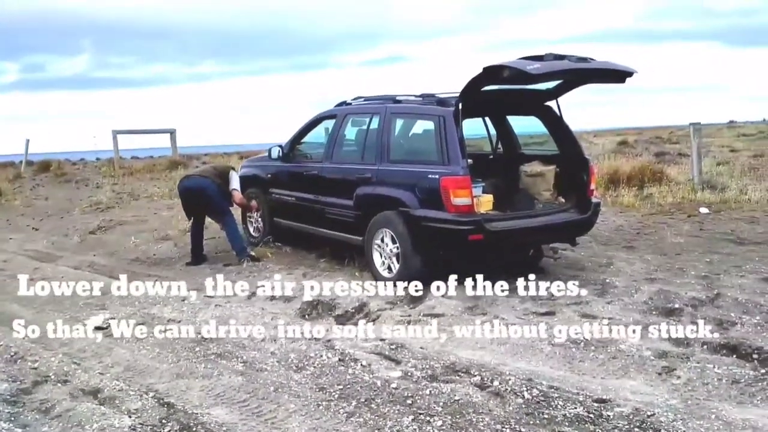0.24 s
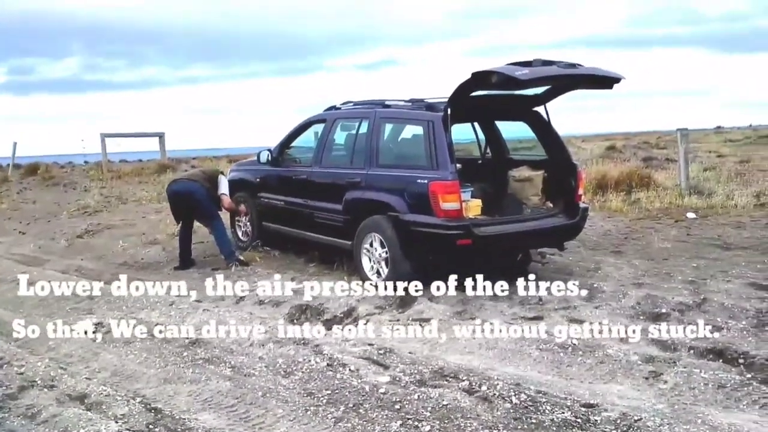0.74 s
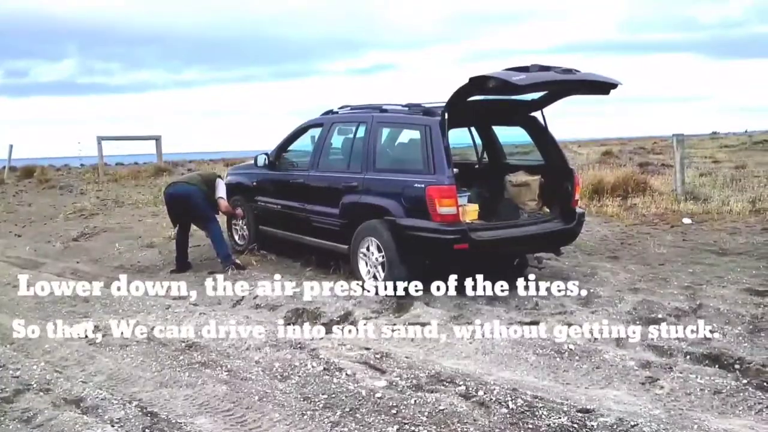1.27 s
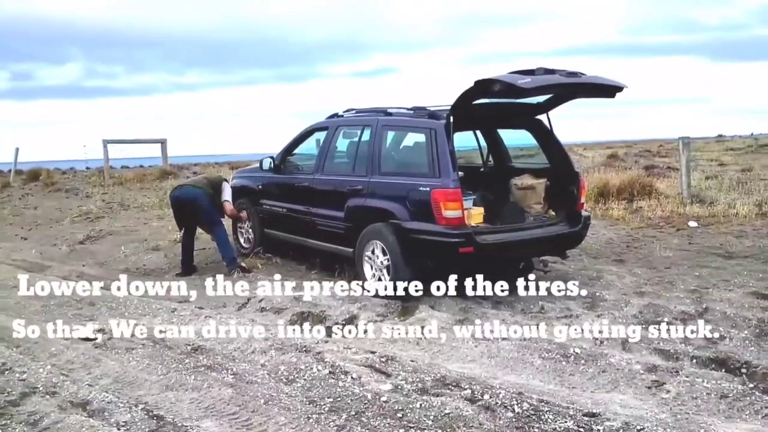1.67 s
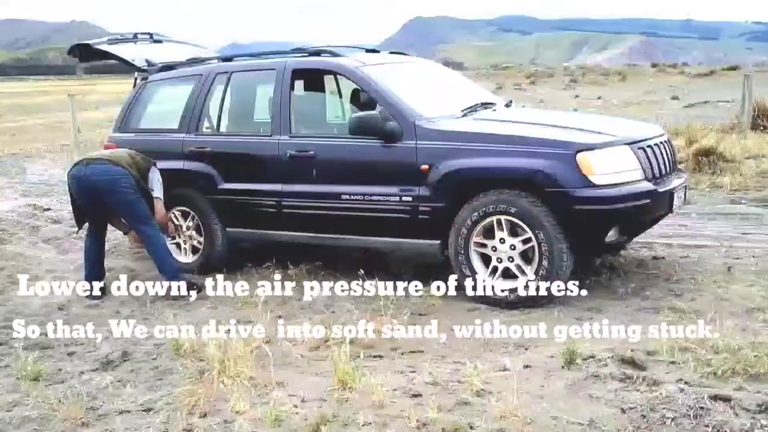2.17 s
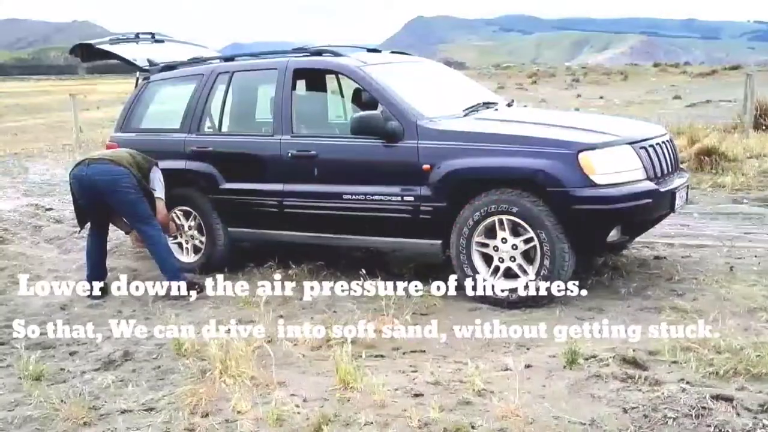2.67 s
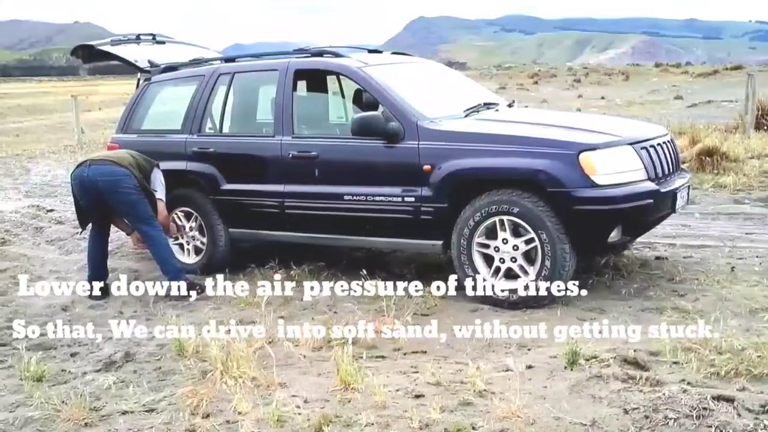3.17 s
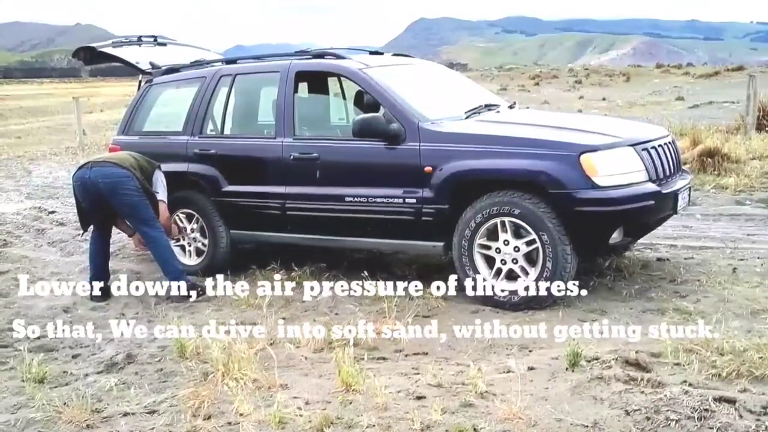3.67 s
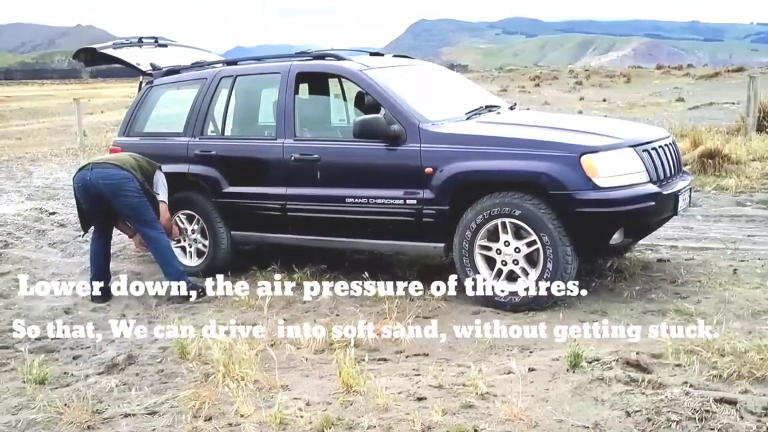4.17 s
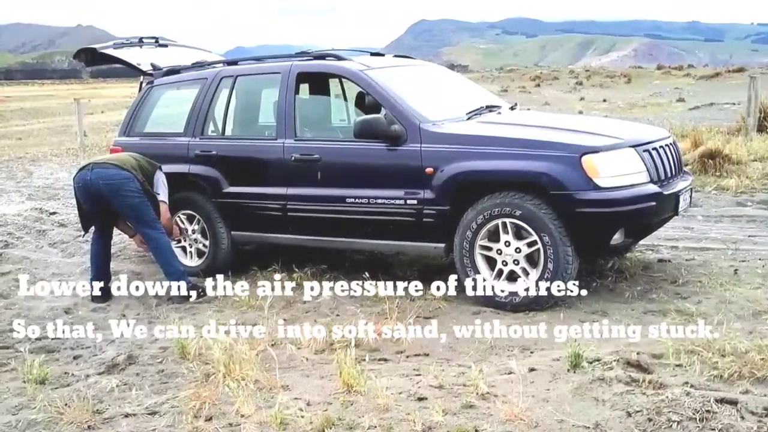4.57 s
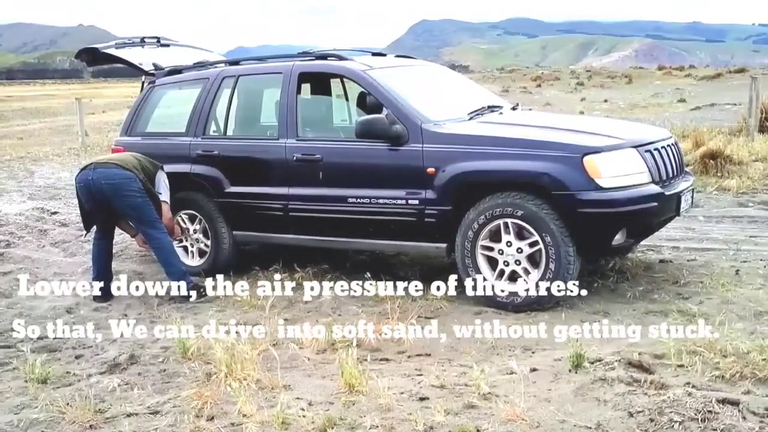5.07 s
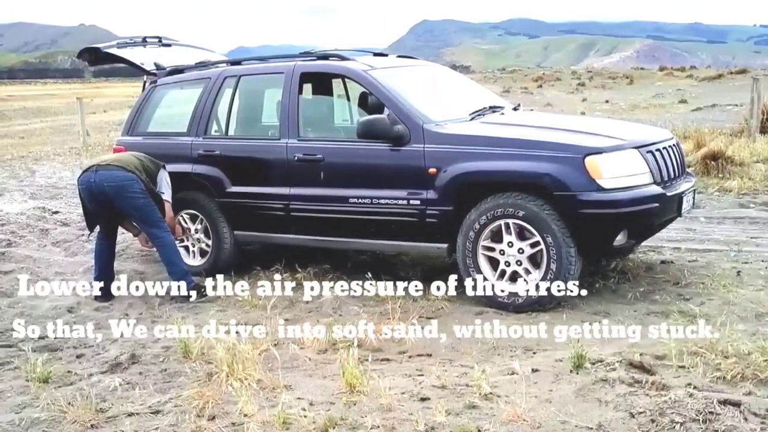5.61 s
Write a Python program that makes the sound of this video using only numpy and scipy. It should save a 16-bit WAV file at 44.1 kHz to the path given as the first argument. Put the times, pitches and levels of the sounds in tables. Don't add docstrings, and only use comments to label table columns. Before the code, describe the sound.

Gusty wind buffets the microphone with faint birdsong, small squeaks and a creak, then a tyre valve hisses steadily after a brief silence.

```python
import sys
import numpy as np
from scipy import signal
from scipy.fft import rfft, irfft, next_fast_len
from scipy.io import wavfile
from scipy.ndimage import uniform_filter1d

SR = 44100
rng = np.random.default_rng(int(sys.argv[2]) if len(sys.argv) > 2 else 0)


def makeup_ratio(level_db):
    decades = np.asarray(level_db, float) / 20
    return 10 ** decades


def transcribe(signal):
    frames = np.atleast_2d(signal).T
    limited = np.clip(frames, -1, 1)
    pcm = np.round(limited * 32767).astype(np.int16)
    wavfile.write(sys.argv[1], SR, pcm)


N = 257753
CUT_S = 2.3
FADE_OUT_S = 2.165

# (pitch [Hz], level [dB per Hz])
JET_TONE_FAR = [(2000, -61), (3000, -34), (4400, -32), (6000, -30.5), (7200, -23), (9000, -22.5),
                (11000, -19.5), (13000, -13.5), (14500, -6), (15500, -4.5)]
JET_TONE_NEAR = [(2000, -68), (3000, -33.4), (5000, -29.2), (6500, -23.4), (8500, -18.0), (10500, -14.6),
                 (12500, -15.8), (14200, -6.2), (15500, -1.2)]
# (pitch [Hz], width [Hz], level [dB])
WHEEL_FAR = [(4700, 60, -8.5), (7760, 170, 10.5), (8120, 100, 10.4), (8420, 120, 9.9), (8840, 200, -3.5),
             (10100, 100, 8.7), (10370, 300, -6.9), (10910, 40, 3.3), (11110, 100, -9.1), (11340, 90, 3.6),
             (13170, 140, -5.2), (13810, 400, 0.7), (14210, 90, -5.8), (15160, 60, 4.4)]
WHEEL_NEAR = [(5710, 170, 5.1), (5890, 40, -4.7), (6140, 160, 4.9), (7010, 50, -6.3), (7240, 40, -4.1),
              (7390, 60, 5.8), (7630, 30, 4.1), (8200, 70, 5.9), (8830, 210, 4.8), (9090, 70, -8.2),
              (9290, 50, 1.8), (9600, 180, -7.3), (10030, 130, 7.4), (10380, 80, 4.6), (10940, 60, -4.9),
              (11180, 50, -4.3), (11350, 40, 3.4), (11560, 280, -8.0), (11990, 100, 7.3), (12240, 60, -5.1),
              (12550, 40, -2.9), (12890, 40, -4.0), (13040, 60, 0.6), (13320, 140, -3.7), (13980, 80, 3.7),
              (14190, 50, -1.3), (14490, 120, 3.6), (14890, 90, -1.3), (15110, 60, 2.1), (15350, 30, -3.6)]
ECHO_DELAYS = [.0013, .0021, .0029, .0038, .005]
# (peak time [s], peak level [dB], length [s])
LEAK_PUFFS = [
    (0, -64, 0.013),
    (.05, -71.5, 0.35),
    (.4, -75, 0.12),
    (.856, -72.5, 0.089),
    (1.244, -71, .04),
    (1.37, -72.5, 0.071),
    (1.466, -69, 0.045),
    (1.6, -74, 0.073),
]
# (pitch [Hz], level [dB per Hz])
WIND_TONE_FAR = [(8.8, -39.5), (15, -12), (59, -1.5), (146, -7.5), (262, -16), (900, -59.5), (1170, -99),
                 (1980, -120)]
WIND_TONE_NEAR = [(8.8, -50), (15, -0.5), (56, -13.5), (95, -18), (146, -27), (214, -34), (367, -57),
                  (500, -53), (650, -89), (1100, -120)]
# (peak time [s], peak level [dB], length [s], flutter relative to gust [dB])
GUSTS_FAR = [(0, -24, 0.01, -4.5), (.08, -32, 0.16, -11.5), (.22, -33, 0.033, -3.5),
             (.29, -33.5, 0.025, -11), (.43, -31, 0.1, -16), (.6, -34.5, 0.19, -9),
             (.75, -31, 0.079, -11.5), (.83, -35.5, 0.13, -4), (.93, -26, 0.016, -13.5),
             (1.03, -34.5, 0.15, -13), (1.15, -34, 0.057, -5), (1.25, -34, 0.046, -6.5),
             (1.36, -32, 0.075, -8), (1.48, -27, 0.03, -11), (1.61, -30, 0.082, -10),
             (1.72, -39, 0.061, -6.5), (1.82, -39, 0.011, 1), (1.88, -28.5, 0.081, -9.5),
             (1.99, -31.5, 0.047, -11), (2.08, -32.5, 0.021, -15), (2.15, -31.5, 0.036, -7)]
GUSTS_NEAR = [(2.47, -38, 0.09, -23), (2.6, -40.5, 0.13, -16), (2.85, -40.5, 0.049, -13),
              (3.0, -45, 0.14, -12), (3.18, -37.5, 0.078, -18.5), (3.35, -46, 0.11, -15),
              (3.53, -39.5, 0.091, -29), (3.65, -32.5, 0.095, -21), (3.86, -34, 0.071, -28),
              (3.96, -43, 0.074, -19), (4.06, -39.5, 0.069, -22), (4.15, -40, 0.026, -27),
              (4.23, -36, 0.041, -22), (4.33, -46, 0.079, -14.5), (4.5, -42.5, 0.11, -22),
              (4.57, -37, 0.022, -26), (4.65, -40, 0.061, -38), (4.8, -40, 0.12, -29),
              (4.95, -36.5, 0.035, -15), (5.1, -34.5, 0.1, -26.5), (5.25, -39, 0.077, -22.5),
              (5.42, -41, 0.17, -20.5), (5.48, -43, 0.042, -12), (5.62, -41, 0.088, -40),
              (5.79, -33.5, 0.066, -25)]
# (time [s], level [dB])
EDDY_FLICKS = [(0.061, -57), (0.083, -60), (0.153, -55), (0.208, -55), (0.231, -56), (0.269, -60),
               (0.398, -55), (0.448, -58), (0.497, -54), (0.588, -52), (0.627, -51.5), (0.719, -55),
               (0.755, -62), (0.785, -65), (0.824, -53.5), (0.916, -51), (0.994, -59), (1.035, -56),
               (1.113, -59), (1.164, -57), (1.199, -56.5), (1.278, -64), (1.347, -60), (1.482, -52.5),
               (1.663, -44), (1.716, -62), (1.868, -61), (1.942, -53.8), (2.002, -56.5), (2.147, -60)]
# (time [s], peak level [dB])
WIND_PUSHES = [(2.525, -32.5), (2.849, -34.5), (3.1805, -27.5), (3.629, -32), (3.659, -25.5), (3.857, -37),
               (4.053, -32), (4.143, -34), (4.502, -36), (4.568, -32.5), (5.097, -28.5), (5.258, -35),
               (5.432, -32.5), (5.484, -29.5), (5.768, -32), (5.785, -33.5), (5.831, -34)]
# (time [s], pitch [Hz], first partial [dB], second partial [dB])
SQUEAKS = [
    [(1.266, 7800, -72, -95), (1.276, 7500, -55, -78), (1.286, 7200, -69, -68), (1.292, 7250, -61, -76),
     (1.303, 7380, -66, -90), (1.317, 7500, -65, -95), (1.322, 7550, -86, -95), (1.35, 7600, -88, -95)],
    [(1.358, 7680, -84, -80), (1.364, 7720, -76, -73), (1.372, 7700, -85, -77), (1.378, 7700, -83, -70),
     (1.4, 7480, -82, -74), (1.406, 7300, -75, -70), (1.41, 7100, -86, -61), (1.414, 6980, -74, -58),
     (1.422, 6750, -78, -88)],
]
# (time [s], peak level [dB], upper ring relative to it [dB])
CREAK_SLIPS = [
    (1.5792, -42, -4),
    (1.5885, -41, -1),
    (1.5995, -43, -10),
    (1.609, -46, -10),
    (1.6175, -45, -6),
    (1.6268, -43, -6),
    (1.6358, -41, -9),
    (1.645, -42, -10),
    (1.654, -46, -4),
]
# (pitch [Hz], level [dB], time to fall 60 dB [s])
CREAK_LOW_RING = [(537, 1, 0.0095), (900, -3, 0.02), (1150, -10.5, 0.0096), (1680, -22, 0.0056)]
CREAK_HIGH_RING = [(2800, -10.5, 0.013), (3660, -25, 0.013), (4700, -26, .015)]
# (time [s], length [s], level [dB], low edge [Hz], high edge [Hz])
SCUFFS = [(0, 0.022, -73, 1000, 15000), (1.012, 0.054, -71, 1700, 2740), (1.013, 0.049, -73, 1100, 4700),
          (1.094, .04, -78, 1400, 2100), (1.224, 0.025, -62.5, 1000, 3650), (1.229, 0.038, -68, 7340, 8950),
          (1.235, .033, -73, 9500, 15400), (1.24, 0.049, -74.5, 2700, 4380),
          (1.468, 0.043, -66.5, 710, 4400), (1.468, 0.047, -73, 1240, 2250),
          (1.482, .022, -68.5, 1570, 1840), (1.472, 0.032, -71, 4550, 5100), (1.475, .028, -73, 2800, 3280),
          (1.503, 0.062, -80, 900, 4000), (1.44, .025, -82, 4400, 5380), (1.557, 0.033, -83, 2600, 3780),
          (1.617, 0.045, -72, 2380, 3000), (1.613, 0.044, -69.5, 7400, 8500),
          (1.63, .03, -72, 12000, 13000), (1.657, .025, -79, 4700, 5500), (1.612, 0.06, -81, 3500, 5000),
          (1.222, 0.036, -79, 900, 2100), (1.262, 0.058, -79, 3000, 4700), (1.542, 0.15, -65.5, 1460, 4170),
          (1.56, 0.022, -70.5, 4960, 9050), (1.571, 0.11, -61.5, 450, 1430), (1.638, 0.68, -67, 500, 4360),
          (1.78, 0.16, -73, 1740, 5050), (2.037, 0.089, -76.5, 900, 5030)]
# (time [s], peak level [dB])
GRIT_SNAP = [
    (1.4666, -39.5),
]
# (pitch [Hz], level [dB], time to fall 60 dB [s])
SNAP_RING = [(1950, -3.5, 0.009), (3610, -11, 0.0091)]
# (time [s], length [s], start [Hz], end [Hz], level [dB])
LARK_SLIDES = [(.38, .07, 3900, 4050, -90), (.4, .16, 4280, 4200, -87), (.455, .015, 4100, 4600, -86),
               (.47, .05, 4530, 3930, -83), (.52, .065, 3990, 3950, -86), (.583, .014, 4000, 4680, -85),
               (.597, .058, 4600, 3800, -81), (.88, .02, 3500, 4500, -84), (.9, .23, 4380, 3790, -85),
               (1.0, .07, 4600, 4800, -92), (1.315, .022, 3500, 2850, -79), (1.34, .035, 2940, 2660, -82)]
# (time [s], length [s], pitch [Hz], swing [Hz], turns [per s], level [dB])
LARK_WARBLE = (.697, .15, 4480, 140, 27.5, -85.5)
# (time [s], hold [s], pitch [Hz], drop [Hz], level [dB])
LARK_WHISTLES = [
    (1.285, .025, 3190, 250, -79),
    (2.728, .008, 3950, 670, -74),
    (2.92, .056, 4150, 950, -74.5),
    (3.635, .012, 3720, 500, -77),
]
# (time [s], pitch [Hz], level [dB])
LARK_ARCHES = [
    [(3.09, 3650, -77), (3.15, 3770, -74), (3.2, 3780, -72), (3.22, 3790, -69), (3.275, 3850, -76),
     (3.306, 3880, -71), (3.314, 3800, -72), (3.328, 3450, -68), (3.338, 3300, -76)],
    [(3.422, 3560, -77), (3.432, 3640, -71), (3.445, 3720, -72), (3.49, 3770, -75), (3.515, 3810, -71),
     (3.54, 3790, -76), (3.566, 3750, -74), (3.6, 3800, -84)],
]
# (start [s], end [s], pulses [per s], level [dB])
LARK_TRILL = (.106, .354, 109, -68.5)
# (time [s], start [Hz], end [Hz], level [dB])
LARK_CHIRPS = [(.17, 4400, 4000, -82), (.29, 3600, 3400, -82), (.315, 3700, 3500, -82),
               (.37, 3550, 3350, -81), (.685, 3700, 3400, -82), (.712, 3700, 3400, -80),
               (.733, 3300, 2800, -80), (.78, 3800, 3100, -81), (.825, 3850, 3600, -82),
               (.93, 4300, 3900, -80), (.94, 3900, 3450, -80), (1.005, 3750, 3550, -81),
               (.81, 5100, 4600, -87), (.765, 3900, 3400, -82), (.935, 3700, 3400, -80),
               (1.045, 3700, 3400, -83), (1.125, 4100, 3600, -81), (.44, 5000, 4700, -88),
               (.65, 5200, 4950, -90), (.67, 4850, 4550, -90), (.06, 3400, 3000, -82),
               (.085, 3000, 3300, -82), (.12, 3700, 3500, -83), (1.31, 3900, 3400, -78)]
# (first time [s], period [s], start [Hz], end [Hz], level [dB])
LARK_PIPS = (.839, .0596, 3400, 3150, -80)
# (pitch [Hz], level [dB per Hz])
AIR_TONE = [(290, -19), (500, -27), (952, -21), (1620, -21.5), (1810, -23.5), (2310, -22.5), (4040, -29.5),
            (6030, -37), (9140, -34.5), (15300, -35.5)]
SURF_TONE = [(180, -30), (300, -1), (517, -4), (1640, 0), (1780, 1.5), (2640, 2.5), (3060, -9),
             (4500, -4.5), (5850, -50), (9900, -120)]
# (time [s], level [dB])
SURF_SWELLS = [
    (2.45, -68),
    (2.9, -67.5),
    (4.2, -68.5),
    (4.45, -70.5),
    (4.95, -67),
    (5.6, -66.5),
    (5.84, -70.5),
]
# (pitch [Hz], share dropped [0-1])
DROPOUTS_NEAR = [(2600, 0), (2950, .3), (3450, .25), (4000, .13), (5200, .08), (5500, 0)]
DROPOUTS_FAR = [(8200, 0), (9000, .3), (11000, .3), (13500, .2), (14500, 0)]
SPLIT_TIMES = [1.925, 1.925, 3.015, 3.015, 3.6, 3.71, 3.945, 3.945, 5.06, 5.085, 5.615, 5.73, 5.73]


def jet(spectrum, wheel, jet_db, patchy_db, count):
    hiss = coloured(rng.standard_normal(N), spectrum, wheel, patchy_db=patchy_db, count=count)
    return makeup_ratio(jet_db) * hiss


def far_jet():
    t = np.arange(N) / SR
    open_s, opening_db_per_s = 1.802, 119.5
    slip_s, slip_db_per_s = 2.055, -20
    opening_db = opening_db_per_s * np.minimum(t - open_s, 0)
    slip_db = slip_db_per_s * np.clip(t - slip_s, 0, FADE_OUT_S - slip_s)
    return jet(JET_TONE_FAR, WHEEL_FAR, -38.5 + opening_db + slip_db, patchy_db=.8, count=5)


def near_jet():
    t = np.arange(N) / SR
    seated_s, seating_db, creep_db_per_s = 2.78, -0.9, 0.17
    flow_db = -34.5 + seating_db * np.clip((seated_s - t) / 0.087, 0, 1) + creep_db_per_s * (t - seated_s)
    return jet(JET_TONE_NEAR, WHEEL_NEAR, flow_db, patchy_db=.5, count=11)


def swaying_echoes(x):
    echo_db, sway_s, sways_per_s = -16, 4e-5, .5
    at = np.arange(N)
    fine = signal.resample_poly(x, up=2, down=1)
    echoes = np.zeros(N)
    for delay_s in ECHO_DELAYS:
        delayed = at - SR * (delay_s + sway_s * drift(sways_per_s))
        echoes += np.interp(2 * delayed, np.arange(2 * N), fine)
    return (x + makeup_ratio(echo_db) * echoes) / np.sqrt(1 + len(ECHO_DELAYS) * makeup_ratio(2 * echo_db))


def leak():
    return makeup_ratio(gusts(LEAK_PUFFS, -99)) * rms_one(band(rng.standard_normal(N), 13100, 21000))


def wind(spectrum, wind_db, bright_db, split_hz, lumpy_db, evenness):
    eddies = coloured(rng.standard_normal(N) * makeup_ratio(lumpy_db * drift(29.0)), spectrum)
    nearby_power = uniform_filter1d(eddies ** 2 + 1e-3, size=2600)
    eddies = eddies / nearby_power ** (np.clip(evenness, 0, 1) / 2)
    low = signal.sosfiltfilt(signal.butter(2, split_hz, fs=SR, output="sos"), eddies)
    flutter = rms_one((eddies - low) * makeup_ratio(4.35 * drift(42.0)))
    push = makeup_ratio(wind_db) * (rms_one(low) + makeup_ratio(bright_db) * flutter)
    port_top = 0.12
    return port_top * np.tanh(push / port_top)


def gusts(rows, calm_db):
    t = np.arange(0, N, 32) / SR
    power = makeup_ratio(2 * calm_db)
    for s, db, length in rows:
        side_length = np.where(t < s, 0.76 * length, length)
        power = power + makeup_ratio(2 * db) * np.exp(-2 * ((t - s) / side_length) ** 2)
    return np.interp(np.arange(N) / SR, t, 10 * np.log10(power))


def gusty(rows, calm_db, calm_flutter_db):
    wind_db = gusts([row[:3] for row in rows], calm_db)
    flutter_rows = [(s, db + below_db, length) for s, db, length, below_db in rows]
    return wind_db, gusts(flutter_rows, calm_flutter_db) - wind_db


def flicks():
    out, u = np.zeros(N), np.arange(-600, 600)
    bump = np.exp(-.5 * (u / SR / 0.0066) ** 2)
    for (s, db), noise in zip(EDDY_FLICKS, rng.standard_normal((len(EDDY_FLICKS), 2400))):
        puff = band(noise, 260, 604)[1200:] * bump
        out[round(s * SR) + u] += makeup_ratio(db + 1.5) * puff / abs(puff).max()
    return out


def buffets():
    push_s, suck_share = .0033, .45
    out = np.zeros(N + 2000)
    u = np.arange(-1500, 1500)
    bump = np.exp(-.5 * (u / SR / push_s) ** 2)
    push = bump - suck_share * np.exp(-.5 * (u / SR * suck_share / push_s) ** 2)
    for s, db in WIND_PUSHES:
        out[round(s * SR) + u] += makeup_ratio(db) * push / push.max()
    return out[:N]


def lulls():
    t = np.arange(0, N, 32) / SR
    lull_s, lull_share = .012, .7
    thin = np.max([np.exp(-.5 * ((t - s) / lull_s) ** 2) for s, db in WIND_PUSHES], axis=0)
    return makeup_ratio(-1.5) * np.interp(np.arange(N) / SR, t, 1 - lull_share * thin)


def squeaks():
    return whistles(SQUEAKS, wobble_db=1)


def creak():
    low, top = np.full((2, SR // 4), 1e-18)
    first = round(CREAK_SLIPS[0][0] * SR)
    for (s, db, top_db), chance in zip(CREAK_SLIPS, rng.standard_normal((9, 2))):
        at = round(s * SR) - first
        low[at] = makeup_ratio(db + .5 * chance[0])
        top[at] = makeup_ratio(db + top_db + .5 * chance[1])
    rung = ring(low, CREAK_LOW_RING) + ring(top, CREAK_HIGH_RING)
    out = np.zeros(N)
    out[first:first + len(low)] = rung + makeup_ratio(-5) * band(top, 1800, 5200)
    return out


def scuffs():
    grains_per_s = 6000
    grains = rng.standard_normal(N) * makeup_ratio(3.0 * np.minimum(rng.exponential(1, N), 4))
    dice, out = rng.random(N), np.zeros(N)
    for start, length, db, low_hz, high_hz in SCUFFS:
        at = slice(round(max(start, 0) * SR), round((start + length) * SR))
        sparse = grains[at] * (dice[at] < grains_per_s / SR)
        burst = rms_one(band(sparse + 1e-18, low_hz, high_hz))
        out[at] += makeup_ratio(db) * burst * signal.windows.tukey(len(burst), .45)
    snap = np.full(N, 1e-18)
    for s, db in GRIT_SNAP:
        snap[round(s * SR)] = makeup_ratio(db + 7)
    return out + makeup_ratio(-2) * band(snap, 1100, 8500) + ring(snap, SNAP_RING) * makeup_ratio(-10)


def lark():
    notes = []
    u = np.linspace(0, 1, num=40)
    for s, length, from_hz, to_hz, db in LARK_SLIDES:
        pitch_hz = to_hz + (from_hz - to_hz) * np.exp(-u / .4)
        notes.append(np.c_[s + length * u, pitch_hz, db + 0 * u])
    s, length, hz, swing_hz, per_s, db = LARK_WARBLE
    pitch_hz = hz - swing_hz * np.cos(2 * np.pi * per_s * length * u)
    notes.append(np.c_[s + length * u, pitch_hz, db + 0 * u])
    scoop_hz_per_s, scoop_share, drop_s, drop_gain_db = 900, .3, .03, 2
    for s, hold, hz, drop_hz, db in LARK_WHISTLES:
        notes.append([(s, hz - scoop_hz_per_s * hold, db),
                      (s + scoop_share * hold, hz - 40, db),
                      (s + hold, hz, db),
                      (s + hold + drop_s, hz - drop_hz, db + drop_gain_db)])
    return makeup_ratio(-1.5) * whistles(notes + LARK_ARCHES, wobble_db=2.0)


def trill():
    start, end, per_s, db = LARK_TRILL
    t = np.arange(N) / SR
    turn = np.minimum((t - start) * per_s % 1 / .45, 1)
    sweep = np.sin(2 * np.pi * np.cumsum(5400 - 2000 * turn) / SR) * np.sin(np.pi * turn)
    swell = window(start, end - start, .02) * np.interp(t, [start, end], [.4, 1])
    return makeup_ratio(db + 2 * drift(30.0)) * sweep * swell


def chirps():
    first_s, period_s, *pip = LARK_PIPS
    pips = [(first_s + k * period_s, *pip) for k in range(7)]
    notes = [[(s, from_hz, db), (s + .012, to_hz, db)] for s, from_hz, to_hz, db in LARK_CHIRPS + pips]
    return whistles(notes, wobble_db=1.5)


def open_air():
    return makeup_ratio(-71.5) * coloured(rng.standard_normal(N), AIR_TONE, patchy_db=.9, count=4)


def surf():
    waves = coloured(rng.standard_normal(N), SURF_TONE, patchy_db=-0.4, count=5)
    return makeup_ratio(in_time(SURF_SWELLS)[0]) * waves


def whistles(notes, wobble_db):
    out = np.zeros(N)
    for rows in notes:
        s, pitch_hz, *levels = np.transpose(rows)
        at = np.arange(round(s[0] * SR), round(s[-1] * SR))
        phase = 2 * np.pi * np.cumsum(np.interp(at / SR, s, pitch_hz)) / SR
        gate = signal.windows.tukey(len(at), min(1, 0.0032 * SR / len(at)))
        for k, db in enumerate(levels):
            out[at] += gate * makeup_ratio(np.interp(at / SR, s, db) + 6.0) * np.sin((k + 1) * phase)
    return out * makeup_ratio(wobble_db * drift(80.0))


def ring(clicks, modes):
    out = 0
    for hz, db, t60 in modes:
        r, w = makeup_ratio(-60 / (t60 * SR)), 2 * np.pi * hz / SR
        out = out + makeup_ratio(db) * signal.lfilter([0, np.sin(w)], [1, -2 * r * np.cos(w), r * r], clicks)
    return out


def coloured(source, spectrum, resonances=(), patchy_db=0., count=1):
    size = next_fast_len(N)
    hz = np.arange(size // 2 + 1) * SR / size + 1e-3
    at, level = np.transpose(spectrum)
    shape_db = np.interp(np.log(hz), np.log(at), level, left=-99, right=level[-1])
    for centre_hz, width_hz, db in resonances:
        shape_db += db * np.exp(-.5 * ((hz - centre_hz) / width_hz) ** 2)
    bins = rfft(source, size) * makeup_ratio(shape_db)
    place = np.interp(np.log(hz), np.log(at[[1, -2]]), [0, count - 1])
    shared = drift(16.0)
    out = np.zeros(N)
    for k in range(count):
        one_slice = irfft(bins * np.clip(1 - abs(place - k), 0, 1), size)[:N]
        out += one_slice * makeup_ratio(patchy_db * (.3 * shared + drift(5.0)))
    return rms_one(out)


def drift(rate):
    r = np.exp(-80 * np.pi * rate / SR)
    slow = signal.lfilter([1], [1, -2 * r, r * r], rng.standard_normal(N // 40 + 2002))[2000:]
    return np.interp(np.arange(N) / 40, np.arange(len(slow)), rms_one(slow))


def band(x, low_hz, high_hz):
    return signal.sosfilt(signal.butter(3, [low_hz, min(high_hz, SR / 2.2)], "band", fs=SR, output="sos"), x)


def window(start, length, edge):
    t = np.arange(N) / SR - start
    return np.sin(np.pi / 2 * np.clip(np.minimum(t, length - t) / edge, 0, 1)) ** 2


def rms_one(x):
    return x / np.sqrt(np.mean(x ** 2) + 1e-20)


def in_time(rows):
    s, *columns = np.transpose(rows)
    return [np.interp(np.arange(N) / SR, s, c) for c in columns]


def far_shot():
    levels_db = gusty(GUSTS_FAR, calm_db=-39.5, calm_flutter_db=-55)
    out = wind(WIND_TONE_FAR, *levels_db, split_hz=141.2, lumpy_db=0.5, evenness=1.0)
    hiss = far_jet()
    out += leak()
    out += open_air()
    out += scuffs() + creak() + trill() + chirps() + squeaks()
    return out, hiss


def near_shot():
    levels_db = gusty(GUSTS_NEAR, calm_db=-56, calm_flutter_db=-70)
    eddies = wind(WIND_TONE_NEAR, *levels_db, split_hz=107.0, lumpy_db=3.5, evenness=0.58)
    hiss = near_jet()
    return buffets() + lulls() * eddies + surf(), hiss


def scene():
    is_far = np.arange(N) / SR < CUT_S
    far, far_hiss = far_shot()
    near, near_hiss = near_shot()
    both = np.where(is_far, far, near) + lark()
    both += swaying_echoes(np.where(is_far, far_hiss, near_hiss)) + flicks()
    return np.tile(both, (2, 1))


def drop_masked(x):
    quiet_until_s = 1.55
    hz, s, cells = signal.stft(x, SR, nperseg=2048)
    dice = rng.random((len(hz) // 5 + 1, len(s) // 2 + 1))
    dice = dice.repeat(5, axis=0).repeat(2, axis=1)[:len(hz), :len(s)]
    power = uniform_filter1d(abs(cells) ** 2, size=5, axis=0)
    strong = power > 3.5 * np.median(power[:, s > CUT_S], axis=1, keepdims=True)
    near_share = np.interp(hz, *np.transpose(DROPOUTS_NEAR))[:, None]
    kept = (dice > near_share) | (s < CUT_S) | strong
    loud = power > 3 * np.median(power[:, s < quiet_until_s], axis=1, keepdims=True)
    far_share = np.interp(hz, *np.transpose(DROPOUTS_FAR))[:, None] * 2 * dice[0]
    kept = kept * np.where((dice > far_share) | (s > quiet_until_s) | loud, 1, .15)
    return signal.istft(cells * kept, SR, nperseg=2048)[1][:N]


def fade():
    dip_s, dip_db, silent_from_s = .035, -9, 2.253
    fade_in_s, fade_in_length_s, creep_s, creep_db = 2.36, .08, .042, -31
    t = np.arange(N) / SR
    dip = makeup_ratio(dip_db * (1 - np.exp(-np.maximum(t - FADE_OUT_S, 0) / dip_s))) * (t < silent_from_s)
    creep = makeup_ratio(creep_db) * np.clip(1 + (t - fade_in_s) / creep_s, 0, 1) ** 2
    return dip + np.maximum(creep, np.clip((t - fade_in_s) / fade_in_length_s, 0, 1))


def split_channels(mono):
    side = np.zeros(N)
    low_edges_hz = 4200 + 9300 * np.linspace(0, 1, len(SPLIT_TIMES)) ** .6
    for s, low_hz in zip(SPLIT_TIMES, rng.permutation(low_edges_hz)):
        high_hz = low_hz + 1700
        at = slice(round(s * SR), round(s * SR) + 2048)
        unlike = band(band(mono[at][::-1], low_hz, high_hz), low_hz, high_hz)
        side[at] += makeup_ratio(-4) * signal.windows.tukey(2048, .7) * unlike
    return mono + side * [[1], [-1]]


def low_pass(x):
    return signal.sosfilt(signal.butter(12, 15600, fs=SR, output="sos"), x)


def record(dry):
    top_cut = signal.ellip(16, .5, 100, 15490, fs=SR, output="sos")
    mono = signal.sosfilt(top_cut, drop_masked(dry[0])) * fade()
    return low_pass(split_channels(mono))


dry = scene()
out = record(dry)
transcribe(out)
```